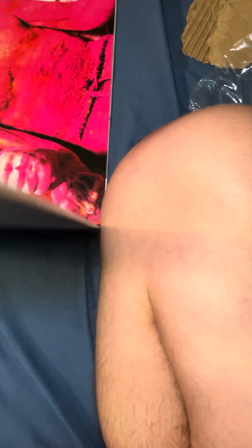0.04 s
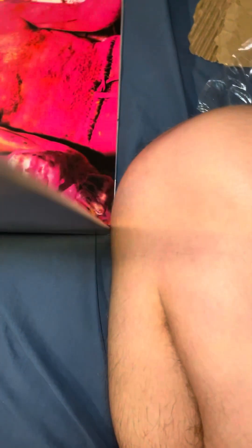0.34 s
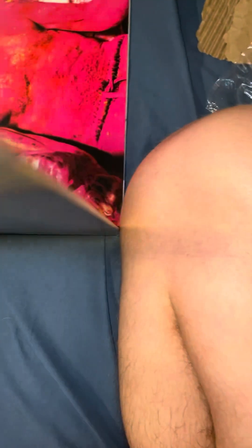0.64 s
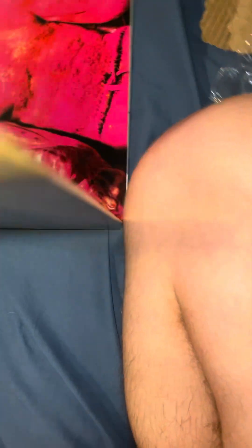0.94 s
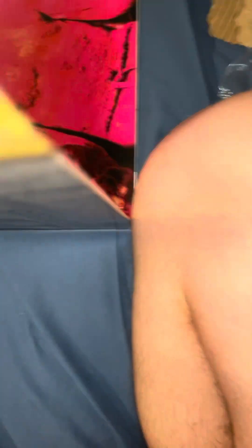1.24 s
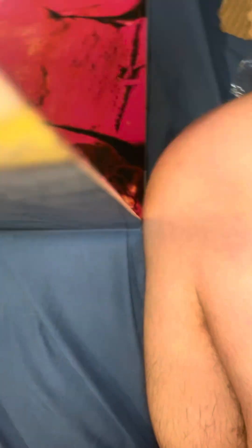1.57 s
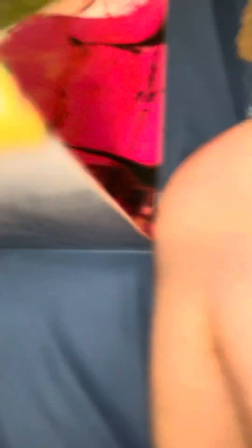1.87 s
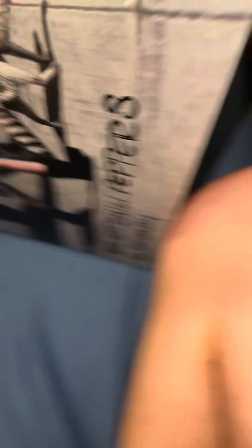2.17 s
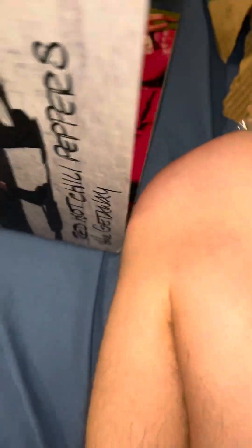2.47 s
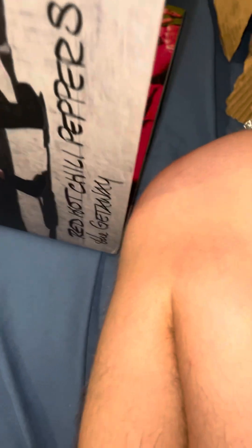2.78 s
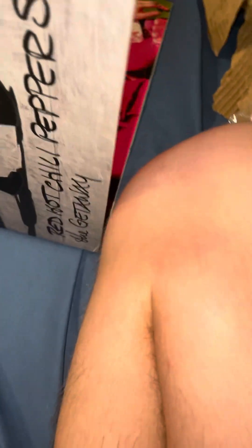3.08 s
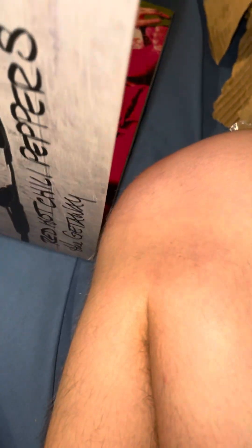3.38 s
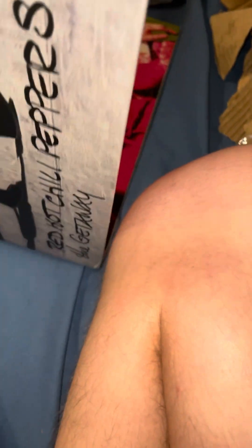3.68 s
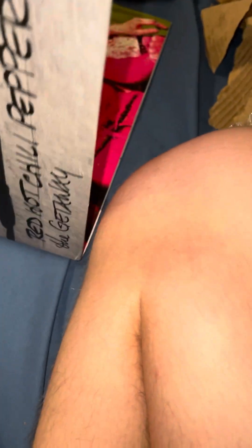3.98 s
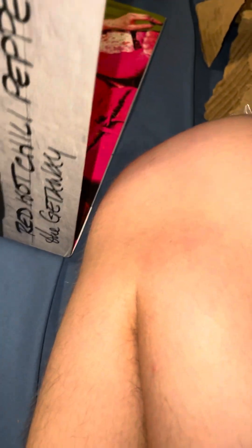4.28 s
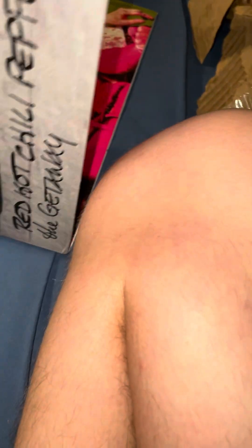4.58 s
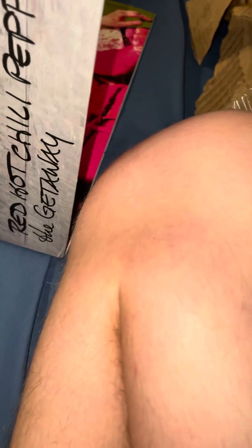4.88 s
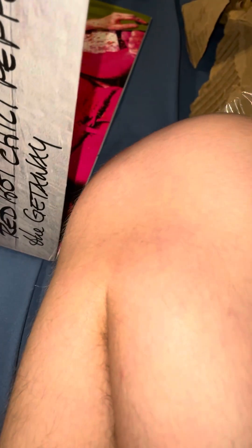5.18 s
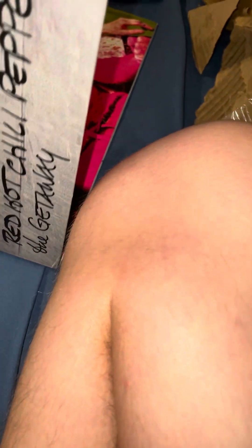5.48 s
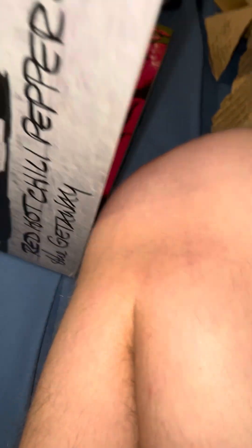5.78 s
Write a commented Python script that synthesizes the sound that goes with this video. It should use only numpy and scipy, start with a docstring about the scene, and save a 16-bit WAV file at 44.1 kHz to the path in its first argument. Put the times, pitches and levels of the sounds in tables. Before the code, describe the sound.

Soft paper rubbing leads to a cardboard flap clapping shut, followed by close, busy rustling, crinkling and hollow bumps.

```python
"""Soft rubbing and small paper ticks, then low thuds and claps as hands fold a cardboard gatefold sleeve
shut, flap after flap, and work at the paper inside. Sliding fibres hiss, edges catch and flick, and the
wide boards flutter, scrape and carry bending waves. Twice a fingertip drags over the cover.
Heard close to a two-port microphone in a small, soft room."""
import sys
import numpy as np
from scipy import signal
from scipy.fft import rfft, irfft
from scipy.io import wavfile
from scipy.ndimage import uniform_filter1d

SR = 44100
rng = np.random.default_rng(int(sys.argv[2]) if len(sys.argv) > 2 else 0)


def dump(signal):
    """Clip the signal to [-1, 1] and save it as 16-bit WAV at the path in sys.argv[1]."""
    limited = np.clip(np.atleast_2d(signal).T, -1, 1)
    pcm = np.round(limited * 32767).astype(np.int16)
    wavfile.write(sys.argv[1], SR, pcm)


N = 257103
TIME_S = np.arange(N) / SR

# Air pushed by the swaying boards. Each row: time in seconds, level in dB.
SWAY_LEVELS = [(0.0, -65), (0.19, -49.5), (0.57, -87), (0.78, -54.5), (1.17, -62), (1.52, -49), (1.77, -55),
               (1.87, -57), (2.09, -31), (2.49, -64), (3.21, -49.5), (3.5, -44.5), (4.71, -44), (4.81, -54),
               (5.03, -48.5)]
# Pushes of the hand. Each row: peak, swell and fade in seconds, slide level in dB,
# slide tilt in dB per octave, flutter level in dB before trim.
STROKES = [(0.158, 0.072, 0.2, -53, -2, -56), (0.368, 0.037, 0.17, -51, -2.5, -49.5),
           (0.723, 0.01, 0.36, -53, -2.5, -56), (0.902, 0.067, 0.045, -52.5, -1.5, -51.5),
           (1.305, 0.0056, 0.9, -57, -3.5, -52.5), (1.48, 0.24, 0.14, -49, 0, -48),
           (1.61, 0.031, 0.14, -47.5, -1.5, -44), (1.74, 0.31, 0.99, -48.5, 3.5, -47),
           (1.883, 0.12, 0.044, -43, 3, -28.5), (1.945, 0.068, 0.083, -37, -4, -46),
           (2.009, 0.042, 0.14, -34, -1, -32), (2.2, 0.16, 0.04, -31, 3, -41),
           (2.36, 0.29, 0.26, -62, -7, -79), (2.577, 0.057, 0.21, -33, 1.5, -40.5),
           (2.767, 0.43, 0.13, -43, -1, -44), (2.994, 0.051, 0.061, -52, 5.5, -49),
           (3.126, 0.15, 0.1, -36.5, -1.5, -35.5), (3.346, 0.066, 0.016, -39.5, 1, -38.5),
           (3.479, 0.082, 0.055, -33.5, 0, -32), (3.612, 0.067, 0.099, -37.5, 0, -38.5),
           (3.76, 0.22, 0.16, -43.5, 1.5, -45.5), (4.023, 0.16, 0.083, -49, 3.5, -50),
           (4.22, 0.22, 0.3, -43.5, -0.5, -41), (4.413, 0.029, 0.63, -41, -1.5, -38.5),
           (4.587, 0.027, 0.1, -30.5, -0.5, -34), (4.69, 0.033, 0.94, -52, 1.5, -59),
           (4.917, 0.081, 0.17, -40.5, 0.5, -41.5), (5.012, 0.11, 0.13, -36, 0, -33),
           (5.148, 0.13, 0.23, -48.5, -1, -52), (5.293, 0.02, 0.29, -44, -0.5, -43),
           (5.531, 0.1, 0.17, -47, 0, -47.5)]
# Tone of the rubbing hiss once shut: two peaks and a shallow dip.
# Each row: centre in Hz, width in octaves, mean gain in dB.
SHUT_TONE = [(2830, 0.23, 7.5), (4330, 0.17, 3), (1400, .35, -2.5)]
# Edges and creases snapping free. Each row: start in seconds, level in dB, tilt in dB per octave,
# ring in Hz, decay time constant in seconds.
FLICKS = [(0.0725, -45, -2, 3770, 0.003), (0.176, -48, -3, 800, 0.0022), (.292, -45.5, -3, 895, 0.0016),
          (.326, -57, -10, 1288, 0.0027), (0.462, -48, -3, 5400, 0.00087), (0.7578, -41.5, 0, 7050, 0.0028),
          (1.322, -50, -11, 1060, 0.0036), (1.4392, -38, -9, 860, 0.004), (1.491, -40, -14.5, 1010, 0.0059),
          (1.521, -48, -6.5, 1400, 0.0035), (1.596, -45, -6, 1050, 0.004), (1.683, -43.5, -12, 840, 0.0046),
          (1.754, -44, -9, 1400, 0.0023), (1.8567, -28, -3, 5130, 0.0034),
          (1.8604, -34, -6.5, 4500, 0.0022), (1.9333, -29, -6, 2560, 0.0012),
          (2.007, -34.5, 34, 11000, 0.0023), (2.0145, -30, 7.5, 3800, .003),
          (2.0882, -27, 5.5, 5500, 0.0017), (2.143, -36, -9.5, 690, 0.002),
          (2.273, -36.5, -1.9, 5060, 0.0027), (2.363, -33.5, 0.5, 6000, 0.0039),
          (2.3741, -34, -1, 2340, 0.0025), (2.4936, -39, 1, 2490, 0.002),
          (2.5813, -23.5, 0.5, 5550, 0.0017), (2.6902, -34.5, -3.5, 2070, 0.0051),
          (2.7802, -34, 0, 5170, 0.0037), (2.862, -43, -3.5, 5950, 0.0036),
          (2.8943, -46, -0.5, 5500, 0.0012), (3.036, -36.5, -3, 2720, 0.006),
          (3.0922, -41, -0.5, 3200, 0.0023), (3.1111, -35, -4, 2200, 0.0025),
          (3.1236, -47, -6, 3010, 0.0016), (3.3501, -34, -1.5, 4250, 0.0024),
          (3.4806, -29.5, -1.5, 5960, 0.0024), (3.506, -24, -0.5, 5400, 0.0049),
          (3.568, -42, -3, 2830, 0.0024), (3.6021, -25.5, -2, 3840, 0.0017),
          (3.647, -36.5, -4, 1630, 0.0018), (3.684, -38.5, -5, 3700, 0.00051),
          (3.6958, -42, -7.5, 1200, 0.0023), (3.7834, -35.5, -4, 2670, 0.00026),
          (3.793, -35.5, -3.5, 3880, 0.0018), (3.822, -32, -4, 4080, 0.0021),
          (3.863, -41.5, -5.5, 4350, 0.00088), (3.8725, -33, -2.5, 4170, 0.0034),
          (3.9288, -39.5, -3.5, 2280, 0.0033), (3.983, -42.5, -5, 2600, 0.0079),
          (4.069, -44, 2, 5000, 0.00098), (4.083, -43, -1.5, 2720, 0.0016),
          (4.0928, -35.5, -4, 4620, 0.0052), (4.157, -38.5, -4.5, 2780, .003),
          (4.2005, -36, -5, 2130, 0.0035), (4.2163, -40.5, -4.5, 4200, 0.00071),
          (4.2683, -35.5, -7, 2690, 0.0045), (4.2912, -32.5, -4, 4100, 0.003),
          (4.3344, -35.5, -3, 2680, 0.0079), (4.345, -33.5, -3, 2820, 0.0066),
          (4.402, -30, 0, 6100, 0.0016), (4.4918, -28, 0.5, 6140, 0.0023),
          (4.5069, -30.5, -0.5, 4800, 0.0019), (4.57, -36, 1, 2730, 0.00096),
          (4.5808, -26, -1, 3050, 0.003), (4.588, -32, 1, 4260, 0.0019), (4.602, -25.5, 2, 2780, 0.0018),
          (4.8046, -41.5, -2.5, 1420, 0.013), (4.899, -23, 0.5, 1570, 0.0082),
          (4.9039, -26, -1, 4530, 0.0059), (4.97, -35.5, 1, 7060, 0.004), (4.998, -28, -0.5, 7100, 0.0038),
          (5.0143, -31, -0.5, 2880, 0.006), (5.0637, -36, -2.5, 5800, 0.0038),
          (5.1286, -41.5, -2, 2200, .002), (5.139, -36, -1.5, 5300, 0.0052),
          (5.1523, -32.5, -1, 5970, 0.0045), (5.2201, -46, -3, 2870, 0.0018),
          (5.2658, -40, -7.5, 2130, 0.0028), (5.2836, -41.5, 0.5, 2180, 0.0012),
          (5.301, -39.5, -0.5, 2760, 0.002), (5.2939, -38, 0, 4680, 0.0048),
          (5.3555, -36, -0.5, 5040, 0.0004), (5.422, -46.5, -3.5, 2600, 0.0029),
          (5.499, -35.5, -2, 4100, 0.0017), (5.592, -43, -6.5, 4320, 0.0024),
          (5.675, -39.5, -2.5, 2280, 0.00069)]
# A board's edge on card. Each row: peak, swell and fade in seconds, level in dB.
SCRAPES = [(.335, 0.11, 0.17, -55.5), (1.335, 0.027, 0.12, -51), (1.43, 0.019, 0.062, -38),
           (1.64, 0.1, 0.38, -48), (1.958, 0.071, 0.029, -34.5)]
# Boards bumping or popping. Each row: start in seconds, level in dB before trim, hollow pitch in Hz.
THUDS = [(.288, -47, 480), (0.759, -41.5, 154), (1.426, -38, 252), (1.631, -43.5, 383), (1.859, -23.5, 276),
         (1.884, -32.5, 220), (1.902, -29, 90), (1.931, -29, 184), (2.049, -34, 156), (2.073, -28.5, 183),
         (2.188, -31.5, 237), (2.373, -39, 360), (2.578, -36, 384), (2.692, -32.5, 293),
         (2.801, -38.5, 210), (2.864, -44, 278), (2.926, -41, 297), (3.324, -38, 286), (3.35, -34.5, 278),
         (3.484, -30.5, 101), (3.509, -30, 262), (3.602, -36, 321), (3.647, -38, 251), (3.78, -35, 135),
         (3.822, -33, 208), (3.874, -34, 278), (3.924, -41, 194), (4.096, -32.5, 194), (4.16, -33.5, 240),
         (4.204, -35, 245), (4.31, -33.5, 254), (4.3327, -29, 388), (4.447, -32.5, 202), (4.507, -33, 323),
         (4.543, -37, 295), (4.605, -27.5, 380), (4.654, -34.5, 55), (4.905, -27.5, 303),
         (5.006, -28.5, 196), (5.144, -35.5, 198), (5.303, -41, 290), (5.595, -38.5, 204),
         (5.678, -45, 232)]
# Flaps landing, the last with a bounce. Each row: start in seconds, pulse level, boom gain and
# scuff level in dB.
CLAPS = [(1.7866, -16.5, 2, -33), (1.862, -25.5, -7, -31), (1.882, -28.5, 0, -41.5)]
# Boom of the closed sleeve. Each row: frequency in Hz, level in dB before boom gain, T60 in seconds.
SLEEVE_MODES = [(81, -25, 0.17), (183, -33, 0.042), (630, -24.5, 0.027)]
# A fingertip on the cover. Each row: peak, swell and fade in seconds, level in dB, pitch in Hz.
FINGER_DRAGS = [(2.745, 0.015, 0.036, -35.5, 3860), (5.775, 0.079, 0.39, -50, 2950)]
# Source spectra. Each row: frequency in Hz, relative gain in dB.
AIR_SPECTRUM = [(20, -29), (60, 7), (150, -10.5), (400, -13), (1500, -25), (5000, -38.5), (15000, -76)]
FLUTTER_SPECTRUM = [(60, -18.5), (115, 3.5), (200, 2), (290, 2), (400, -3.5), (600, -17), (1000, -17),
                    (2500, -55.5)]
SWAY_SPECTRUM = [(16, -57), (30, -12.5), (48, -0.5), (80, 1), (110, -7), (160, -14), (400, -48.5)]
SLIDE_SPECTRUM = [(200, -5), (450, -9.5), (750, 0), (1100, -5.5), (1700, -1.5), (3400, -5), (5700, -3.5),
                  (7000, -10), (12500, -15), (15500, -16)]
FLICK_SPECTRUM = [(100, -13.5), (300, -8), (600, -6.5), (900, -4.5), (1700, -6), (2200, -3.5), (2750, 2),
                  (3450, -3.5), (4300, -.5), (5700, -4.5), (7000, -6), (9000, -8), (12500, -14.5),
                  (15500, -29)]
SCRAPE_SPECTRUM = [(200, -23), (500, 8.5), (900, 5), (1600, -9.5), (3000, -12), (6000, -40), (14000, -22)]
THUD_SPECTRUM = [(50, -3), (120, 14.5), (260, 7), (420, 1), (620, -15.5), (1100, -10.5), (3000, -75)]
CLAP_SPECTRUM = [(60, -33), (150, 2.5), (300, -11), (480, 4), (700, 1), (1000, 0), (1500, -7), (2200, -14),
                 (3500, -16.5), (5500, -37), (9000, -40), (15000, -27)]
# Room decay. Each row: frequency in Hz, T60 in seconds.
ROOM_T60 = [(100, 0.22), (2500, 0.24), (14000, 0.37)]
# Microphone ports. Each row: frequency in Hz, left phase lead in radians, left minus right in dB,
# coherence from 0 to 1.
MIC_PORTS = [(50, 0, 0, .996), (200, -.05, 0, .99), (450, -.2, 0, .95), (1100, -.4, -1, .5),
             (1550, .7, 0, .55), (2000, 0, 0, .95), (2550, .9, 4, .72), (3200, .6, -3.5, .6),
             (3800, .5, 2, .55), (4600, 1.3, 3, .56), (5200, .3, 2, .75), (6200, 1.5, -.5, .9),
             (7200, 3, 0, .97), (8200, 3.4, 0, .97), (10200, 6, 0, .9), (11700, 6.4, 0, .92),
             (13900, 9.3, 0, .95)]

SHUT_S, PRESS_S = 2.4, 0.55


def amp(db):
    return 10 ** (np.asarray(db) / 20)


def unit_rms(x):
    return x / np.sqrt(np.mean(x ** 2) + 1e-20)


def at_level(x, db):
    """Give each row the energy of 10 ms at this level."""
    return amp(db) * x / np.sqrt((x ** 2).sum(1, keepdims=True) / (SR / 100) + 1e-20)


def add(mix, start_s, sound):
    part = mix[:, max(round(start_s * SR), 0):][:, :sound.shape[1]]
    part += sound[:, :part.shape[1]]


def bins_hz(size):
    return np.fft.rfftfreq(size, 1 / SR)


def lookup(table, hz, column=1):
    """Interpolate a column over log frequency."""
    columns = np.transpose(table)
    return np.interp(np.log(hz + 1), np.log(columns[0] + 1), columns[column])


def bell_db(hz, centre_hz, width_oct, gain_db):
    return gain_db * np.exp(-(np.log2((hz + 1) / centre_hz) / width_oct) ** 2)


def tilt_octaves(hz):
    return np.log2(np.clip(hz, 600, 14000) / 3000)


def min_phase(db):
    """Causal response with these gains."""
    log_gain = np.log(amp(np.concatenate([db, db[-2:0:-1]])))
    return np.exp(np.conj(signal.hilbert(log_gain)))[:len(db)]


def coloured(x, spectrum, size=8192):
    """Filter to a spectrum, at unit RMS."""
    impulse = irfft(min_phase(lookup(spectrum, bins_hz(size))))
    return unit_rms(signal.oaconvolve(x, impulse[None], axes=1)[:, :N])


def bending(hz, delay_1khz_s):
    """Bending waves in card: delay goes as 1 / sqrt(f), so treble leads."""
    return np.exp(-4j * np.pi * delay_1khz_s * np.sqrt(1000 * hz))


def wander(rate_hz):
    """Slow noise at unit RMS."""
    return unit_rms(irfft(rfft(rng.standard_normal(N)) / (1 + (bins_hz(N) / rate_hz) ** 4), N))


def smooth_field(shape, time_steps, freq_bins):
    """Smooth noise over frequency (rows) and time (columns)."""
    field = rng.standard_normal(shape)
    for _ in range(2):
        field = uniform_filter1d(uniform_filter1d(field, freq_bins, 0), time_steps, 1)
    return unit_rms(field)


def grains(per_s, spread_db):
    """Sparse, uneven slips; both rows share their timing."""
    sizes = amp(spread_db * np.minimum(rng.exponential(1, N), 4))
    slipping = rng.random(N) < per_s / SR
    return unit_rms(sizes * slipping * rng.standard_normal((2, N)))


def stroke_power(peak_s, swell_s, fade_s, peak_db, range_db=29):
    """Power rises by range_db over the swell and falls as much over the fade."""
    distance = np.maximum((peak_s - TIME_S) / swell_s, (TIME_S - peak_s) / fade_s).clip(0, 8)
    return amp(peak_db - range_db * distance) ** 2


def hand_motion(idle_rub_db=-14.5, idle_flutter_db=-3.5, idle_db_oct=-4.5,
                shut_rub_db=-63.5, linger=1.92):
    """Level and tilt curves: strokes add to idle motion that follows the sway; shut halves rub on."""
    sway_db = np.interp(TIME_S, *np.transpose(SWAY_LEVELS))
    rub_power = amp(sway_db + idle_rub_db) ** 2 + amp(shut_rub_db) ** 2 * (TIME_S > SHUT_S)
    flutter_power = amp(sway_db + idle_flutter_db) ** 2
    weighted_tilt = idle_db_oct * rub_power
    for peak_s, swell_s, fade_s, slide_db, tilt_db_oct, flutter_db in STROKES:
        power = stroke_power(peak_s, swell_s, fade_s, slide_db)
        rub_power += power
        weighted_tilt += tilt_db_oct * power
        flutter_power += stroke_power(peak_s, swell_s, fade_s * linger, flutter_db)
    return 10 * np.log10(rub_power), weighted_tilt / rub_power, 10 * np.log10(flutter_power), sway_db


def room_air(level_db=-62):
    """Faint, steady low noise."""
    return amp(level_db) * coloured(rng.standard_normal((2, N)), AIR_SPECTRUM)


def board_flex(flutter_db, sway_db, flutter_trim_db=-1, lumpy_db=3):
    """Wide boards flutter with small buckles and push slow waves of air."""
    buckles = grains(per_s=900, spread_db=0.5) * amp(lumpy_db * wander(rate_hz=10.4))
    flutter = coloured(buckles, FLUTTER_SPECTRUM) * amp(flutter_db + flutter_trim_db)
    sway = coloured(rng.standard_normal((2, N)), SWAY_SPECTRUM) * amp(sway_db)
    return flutter + sway


def paper_slide(level_db, tilt_db_oct, tick_share=0.52, catch_db=2.6, drift_db=1.6):
    """Fibres slip in a fine hiss with ticks; its tone changes as the sleeve is pressed shut."""
    drive = np.sqrt(1 - tick_share) * rng.standard_normal((2, N))
    drive += np.sqrt(tick_share) * grains(per_s=1400, spread_db=2)
    hz, t, frames = signal.stft(drive, SR, nperseg=512, noverlap=384)
    brightness_db = np.outer(tilt_octaves(hz), np.interp(t, TIME_S, tilt_db_oct))
    pressed = np.clip((t - SHUT_S) / PRESS_S, 0, 1)
    shut_db = pressed * sum(shut_tone_db(hz, t, *row) for row in SHUT_TONE)
    contact_db = drift_db * smooth_field(frames.shape[1:], time_steps=6, freq_bins=7)
    gain = amp(lookup(SLIDE_SPECTRUM, hz)[:, None] + brightness_db + shut_db + contact_db)
    gain /= np.linalg.norm(gain, axis=0)
    hiss = signal.istft(frames * gain, SR, nperseg=512, noverlap=384)[1][:, :N]
    catching = amp(catch_db * wander(rate_hz=48))
    return unit_rms(hiss * catching) * amp(level_db)


def crinkles(slide_db, tilt_db_oct, offset_db=-8, range_db=17, count=350):
    """Small creases give way at random, following the slide's level and tilt."""
    out = np.zeros((2, N))
    for when, strength, pitch in rng.random((count, 3)):
        i = int(when * N)
        level_db = slide_db[i] + offset_db + range_db * (strength - 0.5)
        snap = flick(level_db, tilt_db_oct[i] - 1, ring_hz=900 * 7 ** pitch, decay_s=0.00081)
        add(out, i / SR - 0.0005, snap)
    return out


def flick(level_db, tilt_db_oct, ring_hz, decay_s, rise_s=0.00049, slips_db=3.5,
          rattle_db=-23, rattle_s=0.024, scatter_db=2.4, size=2048):
    """A snap and a few uneven slips mildly ring a patch of dry paper; a faint rattle runs on."""
    hz, t = bins_hz(size), np.arange(size) / SR
    scuff = rng.standard_normal((2, size)) * (1 - np.exp(-(t / rise_s) ** 2))
    slips = amp(slips_db * smooth_field((1, size), time_steps=24, freq_bins=1))
    envelope = np.exp(-t / decay_s) + amp(rattle_db) * np.exp(-t / rattle_s)
    drive = scuff * slips * envelope
    drive[:, round(0.0008 * SR)] += 0.395 * np.sqrt(decay_s * SR)  # the snap
    ring_db = bell_db(hz, ring_hz, width_oct=0.24, gain_db=4.8)
    ring_db += scatter_db * smooth_field((len(hz), 1), time_steps=1, freq_bins=16)[:, 0]
    colour_db = lookup(FLICK_SPECTRUM, hz) + tilt_db_oct * tilt_octaves(hz) + ring_db
    patch = min_phase(colour_db) * bending(hz, delay_1khz_s=0.000693)
    return at_level(irfft(rfft(drive) * patch), level_db)


def edge_flicks():
    """Edges and creases catch and snap free."""
    out = np.zeros((2, N))
    for start_s, *settings in FLICKS:
        add(out, start_s - 0.0005, flick(*settings))
    return out


def edge_scrapes():
    """A board's edge sticks and slips over card in coarse, dull grains."""
    power = sum(stroke_power(*row) for row in SCRAPES)
    return coloured(grains(per_s=460, spread_db=3.5), SCRAPE_SPECTRUM) * np.sqrt(power)


def board_thuds(shove=20, knock_s=0.005, trim_db=1, size=8192):
    """A shove sends low bending waves through a board, which rings hollow at a pitch set by the grip."""
    out = np.zeros((2, N))
    hz, t = bins_hz(size), np.arange(size) / SR
    for start_s, level_db, pitch_hz in THUDS:
        hollow_db = bell_db(hz, pitch_hz, width_oct=0.45, gain_db=14)
        board = min_phase(lookup(THUD_SPECTRUM, hz) + hollow_db) * bending(hz, delay_1khz_s=0.0008)
        drive = rng.standard_normal((2, size)) * np.exp(-t / knock_s)
        drive[:, 0] += shove
        add(out, start_s, at_level(irfft(rfft(drive) * board), level_db + trim_db))
    return out


def flap_clap(start_s, pulse_db, boom_db, scuff_db, side_db=-7, side_lag_s=0.00047, size=16384):
    """Two boards meet: edges scuff, a hard pulse sweeps downward, the sleeve booms briefly."""
    out = np.zeros((2, N))
    hz, t = bins_hz(size), np.arange(size) / SR
    board = min_phase(lookup(CLAP_SPECTRUM, hz)) * bending(hz, delay_1khz_s=0.001036)
    pulse = at_level(irfft(board)[None], pulse_db)[0]
    side = amp(side_db) * np.roll(pulse, round(side_lag_s * SR))
    boom = sum(amp(boom_db + mode_db - 60 * t / t60_s) * np.sin(2 * np.pi * mode_hz * t)
               for mode_hz, mode_db, t60_s in SLEEVE_MODES)
    burst = rng.standard_normal((2, size)) * np.exp(-t / 0.0042)
    scuff = irfft(rfft(burst) * min_phase(lookup(FLICK_SPECTRUM, hz)))
    add(out, start_s - 0.0014, at_level(scuff, scuff_db))
    add(out, start_s, np.array([pulse, side]))
    add(out, start_s + 0.00505, np.array([boom, np.zeros(size)]))
    return out


def shut_tone_db(hz, t, centre_hz, width_oct, mean_db, glide_oct=0.07, depth=0.25):
    """One peak or dip in the hiss glides, swells and fades as the grip shifts."""
    glide = glide_oct * np.interp(t, TIME_S, wander(rate_hz=3))
    strength = 1 + depth * np.interp(t, TIME_S, wander(rate_hz=3))
    return bell_db(hz[:, None], centre_hz * 2 ** glide, width_oct, mean_db * strength)


def finger_drags(width_hz=850):
    """A fingertip drags over the smooth cover with a narrow hiss."""
    out = np.zeros((2, N))
    for peak_s, swell_s, fade_s, level_db, pitch_hz in FINGER_DRAGS:
        band = 1 / (1 + (2 * (bins_hz(N) - pitch_hz) / width_hz) ** 2)
        hiss = irfft(rfft(rng.standard_normal((2, N))) * band, N)
        out += unit_rms(hiss) * np.sqrt(stroke_power(peak_s, swell_s, fade_s, level_db))
    return out


def room(x, wet_db=-15, taps_per_s=2500, predelay_s=0.005, size=16384):
    """Add sparse reflections that decay band by band."""
    taps = rng.standard_normal((2, size)) * (rng.random((2, size)) < taps_per_s / SR)
    taps *= np.arange(size) > predelay_s * SR
    hz, t, frames = signal.stft(taps, SR, nperseg=256)
    decay = amp(-60 * t / lookup(ROOM_T60, hz)[:, None])
    tail = signal.istft(frames * decay, SR, nperseg=256)[1]
    tail /= np.linalg.norm(tail, axis=1, keepdims=True)
    return x + amp(wet_db) * signal.fftconvolve(x, tail, axes=1)[:, :N]


def mic_ports(mid_side):
    """Mid and side rows to left and right ports; the casing shifts phase and balance."""
    phase_rad, balance_db, coherence = (lookup(MIC_PORTS, bins_hz(N), column) for column in (1, 2, 3))
    mid, side = rfft(mid_side) * np.sqrt([(1 + coherence) / 2, (1 - coherence) / 2])
    casing = amp(balance_db / 2) * np.exp(1j * phase_rad / 2)
    norm = np.sqrt((abs(casing) ** 2 + abs(casing) ** -2) / 2)
    return irfft(np.array([(mid + side) * casing, (mid - side) / casing]) / norm, N)


def scene():
    """Paper and boards in a quiet room, mixed as mid and side."""
    air = room_air()
    slide_db, tilt_db_oct, flutter_db, sway_db = hand_motion()
    paper = edge_flicks() + crinkles(slide_db, tilt_db_oct)
    paper += paper_slide(slide_db, tilt_db_oct) + finger_drags()
    boards = board_thuds() + sum(flap_clap(*row) for row in CLAPS)
    boards += edge_scrapes() + board_flex(flutter_db, sway_db)
    return mic_ports(room(paper + boards) + air)


def record(dry):
    """Steep low-pass."""
    cutoff_hz = 15900
    lowpass = signal.firwin(511, cutoff_hz, window=("kaiser", 9), fs=SR)
    return signal.oaconvolve(dry, lowpass[None], "same")


dry = scene()
out = record(dry)
dump(out)
```